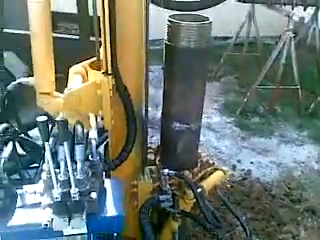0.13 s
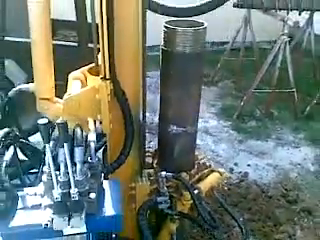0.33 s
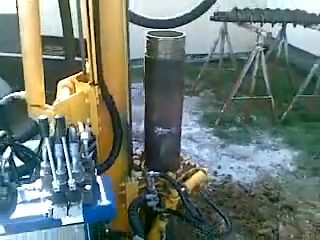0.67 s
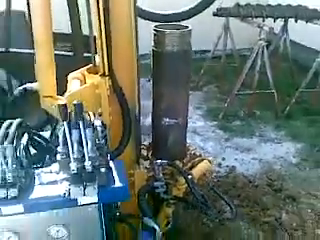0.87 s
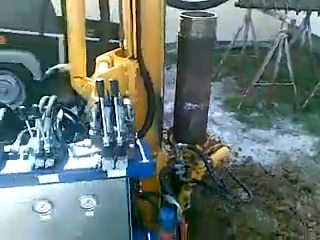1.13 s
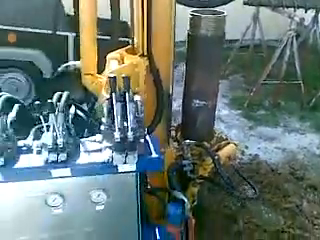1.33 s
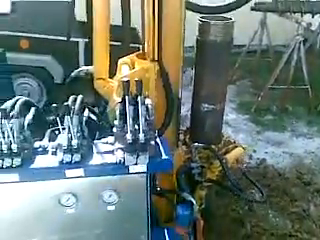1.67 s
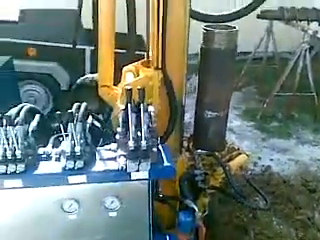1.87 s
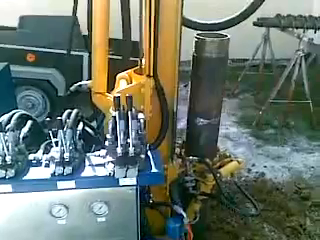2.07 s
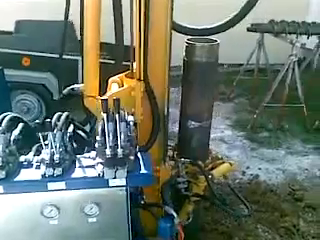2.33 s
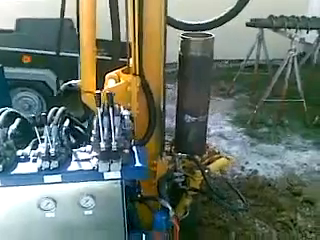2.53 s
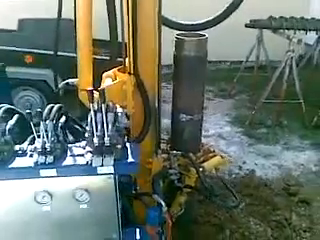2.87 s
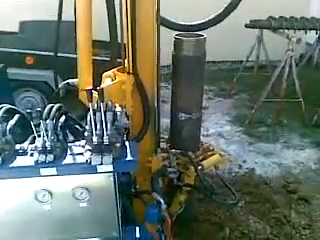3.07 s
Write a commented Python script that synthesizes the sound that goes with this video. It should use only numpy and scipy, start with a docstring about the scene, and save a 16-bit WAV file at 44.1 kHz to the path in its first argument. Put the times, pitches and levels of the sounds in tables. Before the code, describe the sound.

A drilling rig engine clatters loudly and steadily up close, hard metallic knocks surging several times a second

```python
"""The engine and hydraulic unit of a drilling rig run close by and outdoors, over fan noise, rumble and faint hum.
About 26 times a second a sharp tick of filtered noise leads a hard noise-burst knock that rings the steel casing;
the housing booms, thin panels rattle on, then a lighter tick and a rebound fall before the next stroke.
Three or four times a second the load slows the strokes and swells the knocks, and swells of the exhaust's
low harmonics come mostly just after; on some strokes loose steel clanks as damped modes or a bright snap lands."""
import sys
import numpy as np
from scipy import signal
from scipy.fft import rfft, irfft
from scipy.io import wavfile

SR = 44100
rng = np.random.default_rng(int(sys.argv[2]) if len(sys.argv) > 2 else 0)


def log_audio(samples):
    """Write samples as a 16-bit WAV file to the path given in sys.argv[1]."""
    # one column per channel
    frames = np.atleast_2d(samples).T
    # limit to full scale, then quantise
    limited = np.clip(frames, -1, 1)
    pcm = np.round(limited * 32767).astype(np.int16)
    wavfile.write(sys.argv[1], SR, pcm)


N = 141120

# surges of load: start_s (centre), rise_db (before each source's load share), stroke_lag_s
LOAD_SURGES = [(.175, 6.5, .0057), (.485, 5.5, .0052), (.765, 4.5, .0054), (1.02, 5.5, .0051),
               (1.295, 4.5, .004), (1.58, 5, .004), (1.835, 6, .0041), (2.095, 5, .0031), (2.375, 6, .0036),
               (2.625, 5, .0044), (2.95, 4.5, .006), (3.22, 6, .006)]
# slow level changes: start_s, blow_db, tick_db, rattle_db
LEVEL_DRIFT = [(0, 0, -3.5, -1), (.35, -2, -1, 0), (.65, 0.5, -3.5, -0.5), (1., -2.5, 1, 2),
               (1.25, -1, 0, 2.5), (1.451, 0, -0.5, 4.5), (1.85, 0, 0, 0.5), (2.25, -1, 2, 2),
               (2.4, -1, -1, -1.5), (2.7, 0, 1.5, -1), (3.2, 0.5, 0.5, 1)]
# steel casing modes: pitch_hz, level_db, t60_s
CASING_MODES = [(375, -8.5, 0.12), (441, -5.5, 0.064), (521, -2, 0.38), (669.6, -5, 0.1), (846, -6.5, 0.18),
                (1233, -10, 0.21), (1609, -5.5, 0.073), (1787, -17, 0.044), (2130, -11.5, 0.039),
                (2263, -2.5, 0.13), (2376, -9.5, 0.1), (2740, -4.5, 0.18), (2943, -5.5, 0.13)]
# spectrum of the fan and rumble: frequency_hz, gain_db
FAN_COLOUR = [(20, -27), (42, 1), (70, -0.5), (100, -1.5), (140, 2.5), (220, -5), (300, -0.5), (400, 0),
              (580, -2), (1000, -3), (1650, 1), (2400, -4), (3300, -7.5), (4800, -14), (6500, -14.5),
              (8200, -15), (10000, -23.5), (12500, -30), (15500, -44)]
# steady hum: pitch_hz, level_db
HUM_TONES = [(80.7, -44), (126, -48.5)]
# exhaust harmonics: multiple (of the stroke rate), level_db (before the swells)
EXHAUST_HARMONICS = [(1, -47), (2, -30), (3, -46), (4, -48), (5, -48.5), (7, -42.5)]
# swells of the exhaust, most just after a surge: centre_s, length_s, level_db
EXHAUST_SWELLS = [(.0, .08, -4), (.215, .15, 0), (.50, .15, -.5), (.795, .12, .5), (1.06, .15, -1),
                  (1.335, .16, -.5), (1.595, .14, -1), (1.875, .105, -.5), (2.125, .15, -.5),
                  (2.395, .16, -.5), (2.675, .13, 0), (2.975, .12, 0), (3.15, .1, -6)]
# air resonance of the engine housing: start_s, centre_hz, level_db (relative)
HOUSING_BOOM = [(0, 465, -1.5), (.25, 448, 5), (0.599, 455, 3.5), (1.0, 409.8, 1.5), (1.3, 402, -3),
                (1.8, 405, -4.5), (2.2, 390, -6), (2.4, 393.8, -5.5), (2.7, 390, 1), (3.2, 400, -1.5)]
# rattle of thin panels: start_s, level_db (relative)
PANEL_DRIFT = [(0, -5), (.9, -6), (1.15, 6.5), (1.35, 3), (1.55, -1), (1.8, 5.5), (2.15, 8), (2.45, 4.5),
               (2.75, -0.5), (3.2, -9)]
# spectrum of the panels: frequency_hz, gain_db
PANEL_COLOUR = [(1200, -35), (1900, -1.5), (2250, 0.5), (2550, -4), (2850, -0.5), (3300, -10), (4300, -19),
                (8000, -59)]
# loose steel that clanks on some strokes: start_s, pitch_hz, level_db
STEEL_CLANKS = [(.162, 1790, -16), (.201, 1710, -18.5), (.353, 1640, -20), (.471, 2330, -22),
                (.510, 1800, -17), (.662, 1640, -14.5), (.780, 1520, -17), (.975, 1614, -16),
                (1.054, 1060, -19.5), (1.093, 2200, -22), (1.127, 2740, -20), (1.128, 1600, -17),
                (1.166, 1840, -17), (1.244, 2120, -15), (1.246, 2740, -18.5), (1.361, 2140, -20),
                (1.398, 1880, -19), (1.595, 1520, -17.5), (1.788, 2320, -17), (1.826, 934, -16.5),
                (1.867, 2380, -21), (2.136, 2220, -21), (2.137, 1150, -22), (2.332, 2280, -20),
                (2.369, 1650, -18.5), (2.447, 1650, -20), (2.527, 1645, -18.5), (2.565, 1640, -21),
                (2.602, 967, -20), (2.641, 2125, -22.5), (2.680, 1590, -18.5), (2.760, 1597, -17.5),
                (2.8328, 1600, -17.5), (2.990, 1004, -22), (3.186, 1620, -20)]
# extra sharp metal snaps: start_s, level_db (before colouring)
METAL_SNAPS = [(.161, -26), (.2385, -28), (.7003, -27), (1.0131, -28), (1.2445, -28), (1.826, -26),
               (1.976, -28), (2.2885, -19), (2.3678, -22), (2.7555, -23), (2.833, -29), (2.987, -28)]
# spectrum of the snaps: frequency_hz, gain_db
SNAP_COLOUR = [(300, -34), (1500, -13), (3000, -6), (5000, -3), (8200, 1), (10500, -3), (13000, -5),
               (15500, -10)]
# spectrum of the main tick: frequency_hz, gain_db
TICK_COLOUR = [(500, 0.5), (2000, -28), (3500, -7.5), (5000, -10.5), (6400, -2), (7100, -5), (8200, 2.5),
               (9000, -3.5), (10000, -10), (12000, -16), (15500, -33)]
# spectrum of the lighter tick: frequency_hz, gain_db
LIGHT_TICK_COLOUR = [(1000, -50), (4000, -11), (6500, 2.5), (7500, 15), (8400, 11.5), (9200, 6.5),
                     (10500, -4), (15000, -38)]
# spectrum of the knock: frequency_hz, gain_db
KNOCK_COLOUR = [(100, -16.5), (250, -8.5), (320, -6), (400, -3.5), (500, -9), (600, -9.5), (760, -4.5),
                (1050, -0.5), (1400, -0.5), (1750, -1.5), (2400, -4), (3200, -8.5), (3900, -12.5),
                (4800, -14.5), (7000, -16.5), (10000, -22.5), (15000, -59)]

STROKE_HZ, FIRST_STROKE_S, TIMING_JITTER_S = 25.8, -.0007, .0003
SURGE_WIDTH_S, SAG_WIDTH_S = .06, .057
CONTACTS_PER_S, SMOOTH_SHARE = 7500, .85
FAN_DB, PANEL_DB = -27.5, -38.5
THROB_REST = .15  # share of the throb that never dies away
BOOM_DB, BOOM_HALF_WIDTH_HZ, BOOM_LOAD_SHARE = -35.5, 65, 1.0
BOOM_ECHO_S, BOOM_ECHO_SHARE = .018, .4
CLANK_T60_S, CLANK_SPREAD, CLANK_SIDE_DB, CLANK_CRACK_DB = .058, .079, -6, -6.5
SNAP_ATTACK_S, SNAP_DECAY_S = .0006, .002
TICK_DB, TICK_SCATTER_DB, TICK_LOAD_SHARE = -34, 1.3, 1.05
TICK_ATTACK_S, TICK_DECAY_S, BOUNCE_SHARE = .0024, .0068, .7
TICK_TAIL_S, TICK_TAIL_SHARE, TAIL_LOAD_SHARE = .03, .2, 1.4
LIGHT_TICK_DB, LIGHT_SCATTER_DB, LIGHT_LAG_S = -40.5, 2.2, .026
PING_HZ, PING_DB, PING_SPREAD = 8350, -46.5, .025
KNOCK_DB, KNOCK_SCATTER_DB, KNOCK_LOAD_SHARE = -26, .8, .85
BLOW_LAG_S, BLOW_ATTACK_S, BLOW_DECAY_S = .0007, .0042, .0125
REBOUND_LAG_S, REBOUND_DB, REBOUND_SCATTER_DB = .0315, -5, 2.5
TOP_HZ = 15700


def undb(db):
    """Decibel law: convert a level to an amplitude ratio."""
    return 10 ** (np.asarray(db) / 20)


def level(x, db):
    """Root-mean-square normalisation: set the mean power of a signal."""
    return x * undb(db) / np.sqrt(np.mean(x ** 2))


def colour(x, points):
    """Minimum-phase filtering: a folded cepstrum makes the response causal."""
    hz, db = np.array(points).T
    size = 4096
    f = np.maximum(np.arange(size // 2 + 1) * SR / size, 1)
    gain_db = np.interp(np.log(f), np.log(hz), db)
    cepstrum = irfft(np.log(undb(gain_db)))
    cepstrum[1:size // 2] *= 2
    cepstrum[size // 2 + 1:] = 0
    impulse_response = irfft(np.exp(rfft(cepstrum)))
    return signal.fftconvolve(x, impulse_response)[:N]


def drift(axis):
    """Amplitude modulation: a slow gain from one column of the drift table."""
    rows = np.array(LEVEL_DRIFT).T
    return undb(np.interp(np.arange(N) / SR, rows[0], rows[axis]))


def surge(t):
    """Superposition: Gaussian load surges add to a rise in dB."""
    return sum(db * np.exp(-((t - s) / SURGE_WIDTH_S) ** 2 / 2) for s, db, _ in LOAD_SURGES)


def strokes():
    """Periodic excitation with lag: the engine falls behind in each surge and catches up after it."""
    times = FIRST_STROKE_S + np.arange(int(N / SR * STROKE_HZ) + 1) / STROKE_HZ
    sag = sum(lag * np.exp(-((times - s) / SAG_WIDTH_S) ** 2 / 2) for s, _, lag in LOAD_SURGES)
    return times + sag + TIMING_JITTER_S * rng.standard_normal(len(times))


def bursts(times, sizes, attack_s, decay_s):
    """Transient envelope: each blow rises linearly, then decays exponentially."""
    out, t = np.zeros(N), np.arange(N) / SR
    for s, size in zip(times, sizes):
        part = slice(max(int(s * SR), 0), max(int((s + .1) * SR), 0))
        age = np.maximum(t[part] - s, 0)
        rise = np.minimum(age / attack_s, 1)
        out[part] += size * rise * np.exp(-np.maximum(age - attack_s, 0) / decay_s)
    return out


def chatter():
    """Shot noise: sparse random metal contacts over a share of smooth hiss."""
    chance = CONTACTS_PER_S / SR
    contacts = (rng.random(N) < chance) * rng.standard_normal(N) / np.sqrt(chance)
    return contacts + SMOOTH_SHARE * rng.standard_normal(N)


def casing(x, ring_db):
    """Modal resonance: the force itself plus the damped modes it rings in the steel."""
    t = np.arange(SR // 3) / SR
    ring = 0
    for hz, db, t60 in CASING_MODES:
        scale = np.log(1000) / (t60 * SR)  # evens out long and short decays
        ring = ring + undb(db - 60 * t / t60) * np.cos(2 * np.pi * hz * t) * scale
    return x + undb(ring_db) * signal.fftconvolve(x, ring)[:N]


def fan():
    """Broadband flow noise: steady cooling air and machine rumble, coloured by the casing."""
    return level(colour(casing(rng.standard_normal(N), ring_db=6.0), FAN_COLOUR), FAN_DB)


def tone(t, hz, db):
    """Simple harmonic motion: one sine at a random phase."""
    return level(np.sin(2 * np.pi * (hz * t + rng.random())), db)


def exhaust(t):
    """Harmonic series: multiples of the stroke rate in flat-topped swells, with a faint steady hum."""
    swell = sum(undb(db) * np.exp(-(2 * (t - s) / length) ** 4 / 2) for s, length, db in EXHAUST_SWELLS)
    throb = sum(tone(t, round(k) * STROKE_HZ, db) for k, db in EXHAUST_HARMONICS)
    hum = sum(tone(t, hz, db) for hz, db in HUM_TONES)
    return (THROB_REST + (1 - THROB_REST) * swell) * throb + hum


def boom(times):
    """Cavity resonance: strokes thump the housing air, hard then softly; it sinks as the listener moves."""
    s, hz, db = np.array(HOUSING_BOOM).T
    t = np.arange(N) / SR
    sizes = undb(BOOM_LOAD_SHARE * surge(times))
    thump_times = np.r_[times, times + BOOM_ECHO_S]
    thump_sizes = np.r_[sizes, BOOM_ECHO_SHARE * sizes]
    thumps = bursts(thump_times, thump_sizes, attack_s=0.00045, decay_s=0.011)
    push = thumps * (rng.standard_normal(N) + 1j * rng.standard_normal(N))
    # narrow noise around zero frequency, then shifted up to the moving centre
    ring = signal.sosfilt(signal.butter(2, BOOM_HALF_WIDTH_HZ, fs=SR, output="sos"), push)
    carrier = np.exp(2j * np.pi * np.cumsum(np.interp(t, s, hz)) / SR)
    return level((ring * carrier).real * undb(np.interp(t, s, db)), BOOM_DB)


def panels(times):
    """Forced vibration: thin panels keep rattling after each knock."""
    s, db = np.array(PANEL_DRIFT).T
    shake = bursts(times + BLOW_LAG_S, undb(1.3 * surge(times)), attack_s=0.0076, decay_s=.026) * chatter()
    rattle = colour(casing(shake, ring_db=13), PANEL_COLOUR)
    return level(rattle * undb(np.interp(np.arange(N) / SR, s, db)), PANEL_DB)


def clanks():
    """Impact and free vibration: struck loose steel cracks and rings in three quickly damped modes."""
    out, t = np.zeros(N + SR), np.arange(SR // 8) / SR
    crack_band = signal.butter(2, [600, 4000], "band", fs=SR, output="sos")
    for s, hz, db in STEEL_CLANKS:
        side_hz = hz * (1 + CLANK_SPREAD * np.array([-1, 1]) * rng.uniform(0.86, 1.17, size=2))
        sides = sum(np.sin(2 * np.pi * (f * t + rng.random())) for f in side_hz)
        modes = np.sin(2 * np.pi * hz * t) + undb(CLANK_SIDE_DB) * sides
        crack = signal.sosfilt(crack_band, rng.standard_normal(len(t))) * np.exp(-t / 0.017)
        ring = modes * undb(-60 * t / CLANK_T60_S)
        onset = 1 - np.exp(-t / 0.0013)
        start = int(s * SR)
        out[start:start + len(t)] += undb(db) * (ring + undb(CLANK_CRACK_DB) * crack) * onset
    return out[:N]


def snaps():
    """Short impact, wide spectrum: now and then the tick lands hard and bright."""
    times, db = np.array(METAL_SNAPS).T
    force = bursts(times, undb(db), SNAP_ATTACK_S, SNAP_DECAY_S) * rng.standard_normal(N)
    return colour(force, SNAP_COLOUR)


def pings(starts, detune):
    """Damped resonance: each tick pings at a slightly different pitch and a random strength."""
    stroke = np.searchsorted(starts, np.arange(N) / SR) - 1
    hz = PING_HZ * (1 + PING_SPREAD * detune[stroke])
    envelope = bursts(starts, rng.random(len(starts)), attack_s=0.00077, decay_s=0.0049)
    return envelope * np.sin(2 * np.pi * np.cumsum(hz) / SR)


def ticks(times):
    """Repeated contact: a bright tick bounces once and sizzles on; a lighter one comes two thirds through."""
    chance = rng.standard_normal((len(times), 4)).T
    sizes = undb(TICK_LOAD_SHARE * surge(times) + TICK_SCATTER_DB * chance[0])
    bounce_times = times + rng.uniform(.002, .007, len(times))
    bounce_sizes = BOUNCE_SHARE * sizes * rng.random(len(times))
    bounce = bursts(bounce_times, bounce_sizes, SNAP_ATTACK_S, SNAP_DECAY_S)
    tail_sizes = TICK_TAIL_SHARE * undb(TAIL_LOAD_SHARE * surge(times))
    tail = bursts(times, tail_sizes, TICK_ATTACK_S, TICK_TAIL_S)
    # independent noises add in power
    main = np.hypot(bursts(times, sizes, TICK_ATTACK_S, TICK_DECAY_S) + bounce, tail)
    light_sizes = undb(.5 * surge(times) + LIGHT_SCATTER_DB * chance[1])
    light = bursts(times + LIGHT_LAG_S, light_sizes, TICK_ATTACK_S, TICK_DECAY_S)
    ping = pings(times + 0.0036, chance[2]) + pings(times + LIGHT_LAG_S + 0.00068, chance[3])
    main_tick = level(colour(main * chatter(), TICK_COLOUR), TICK_DB)
    light_tick = level(colour(light * chatter(), LIGHT_TICK_COLOUR), LIGHT_TICK_DB)
    return (main_tick + light_tick + level(ping, PING_DB)) * drift(axis=2)


def knocks(times):
    """Impact excitation: blow and rattle grow with load; an uneven lighter rebound falls between strokes."""
    chance = rng.standard_normal((len(times), 2)).T
    sizes = undb(KNOCK_LOAD_SHARE * surge(times) + KNOCK_SCATTER_DB * chance[0])
    force = bursts(times + BLOW_LAG_S, sizes, BLOW_ATTACK_S, BLOW_DECAY_S)
    rebound_sizes = undb(REBOUND_DB + REBOUND_SCATTER_DB * chance[1])
    rebound = bursts(times + REBOUND_LAG_S, rebound_sizes, attack_s=0.0016, decay_s=0.0076)
    blow = (force + rebound) * chatter() * drift(axis=1)
    rattle = bursts(times + 0.0023, sizes, attack_s=0.002, decay_s=0.018) * chatter() * drift(axis=3)
    # a 900 Hz low-pass dulls the rattle
    rattle = signal.sosfilt(signal.butter(2, 900, fs=SR, output="sos"), rattle)
    struck = casing(blow + undb(-1.0) * rattle, ring_db=17.0)
    return level(colour(struck, KNOCK_COLOUR), KNOCK_DB)


def scene():
    """Linear superposition: all sources add, with the stroke-driven ones sharing one clock."""
    t = np.arange(N) / SR
    times = strokes()
    background = fan() + exhaust(t)
    body = boom(times) + panels(times)
    metal = clanks() + snaps()
    return (background + body + metal + ticks(times) + knocks(times))[None]


def record(dry):
    """Saturation and band limiting: the recorder rounds the highest peaks and cuts the top."""
    low_pass = signal.ellip(8, .2, 70, TOP_HZ, fs=SR, output="sos")
    return signal.sosfilt(low_pass, np.tanh(dry))


dry = scene()
out = record(dry)
log_audio(out)
```